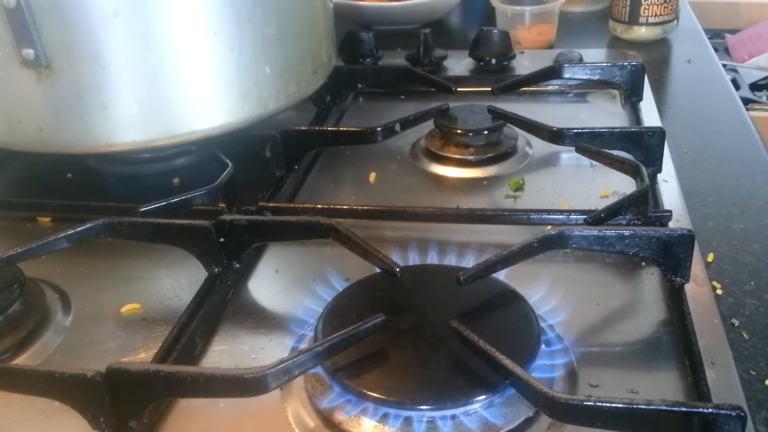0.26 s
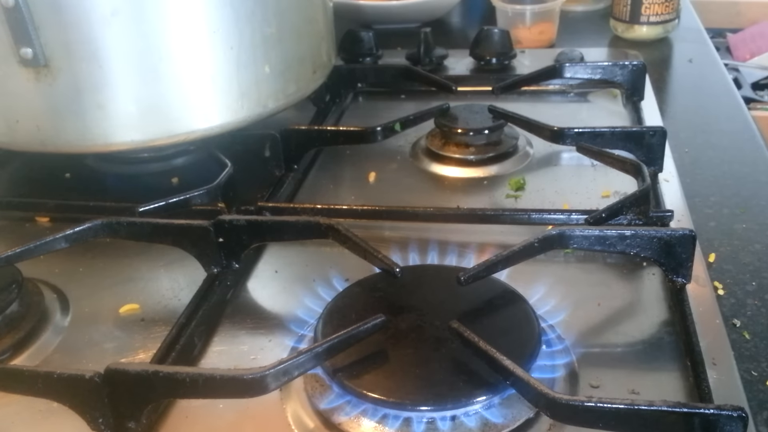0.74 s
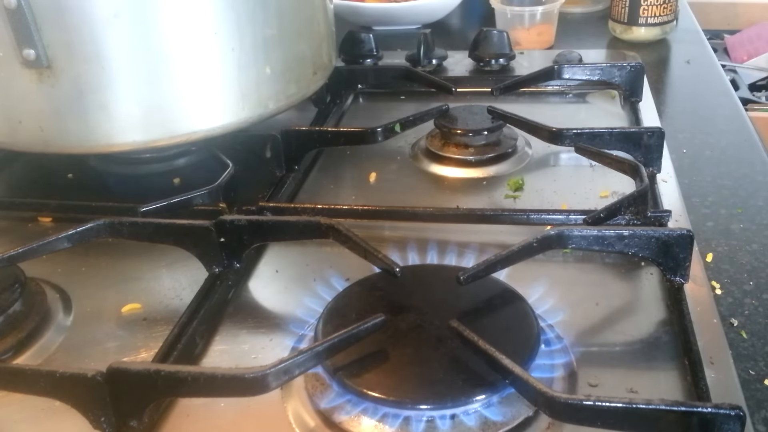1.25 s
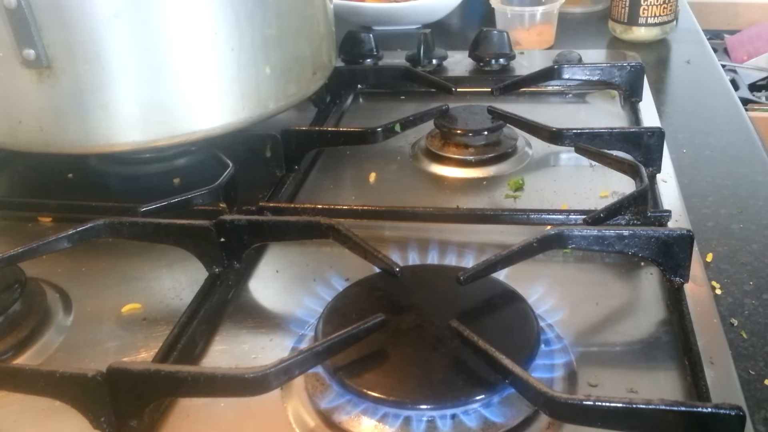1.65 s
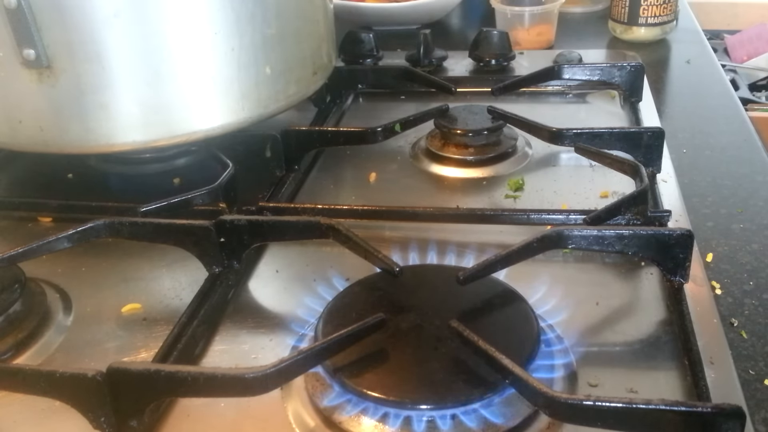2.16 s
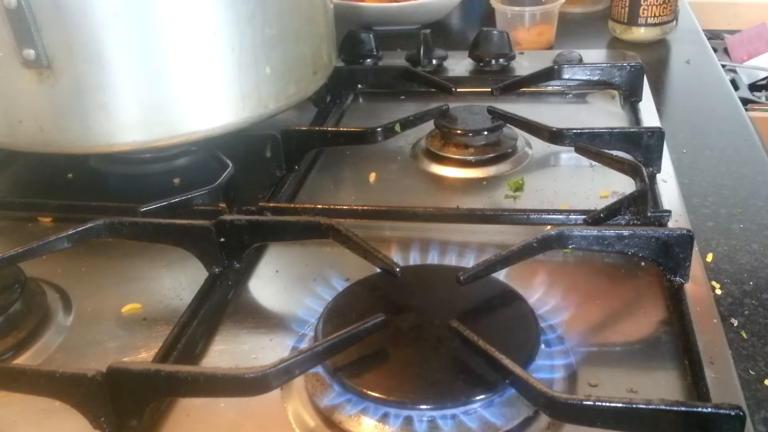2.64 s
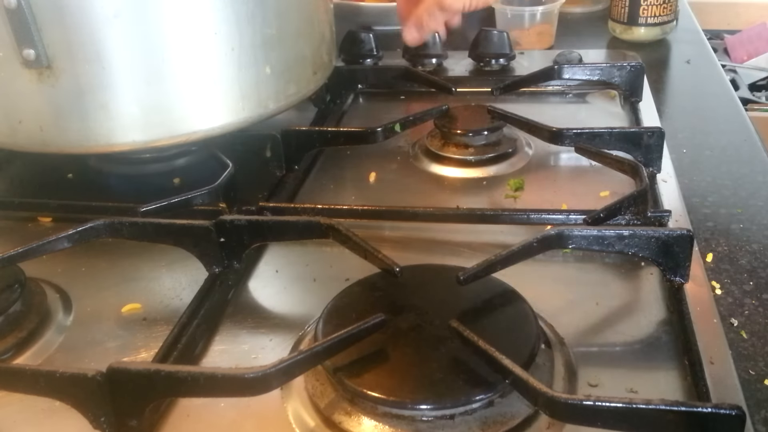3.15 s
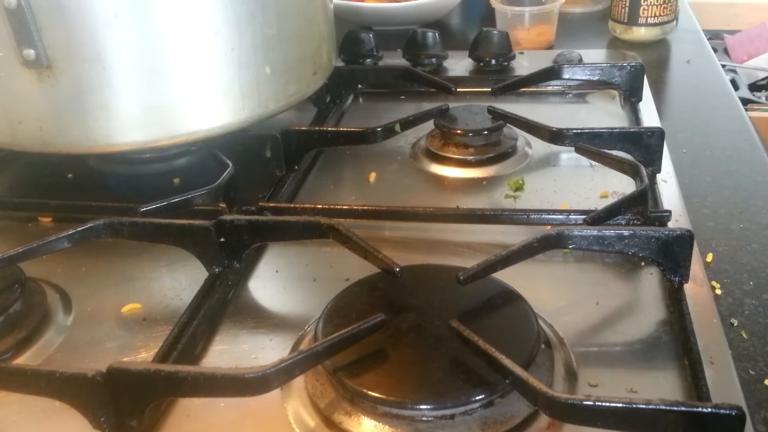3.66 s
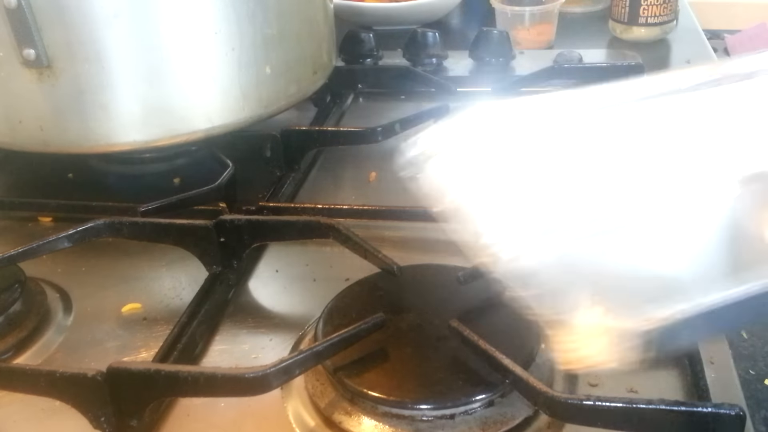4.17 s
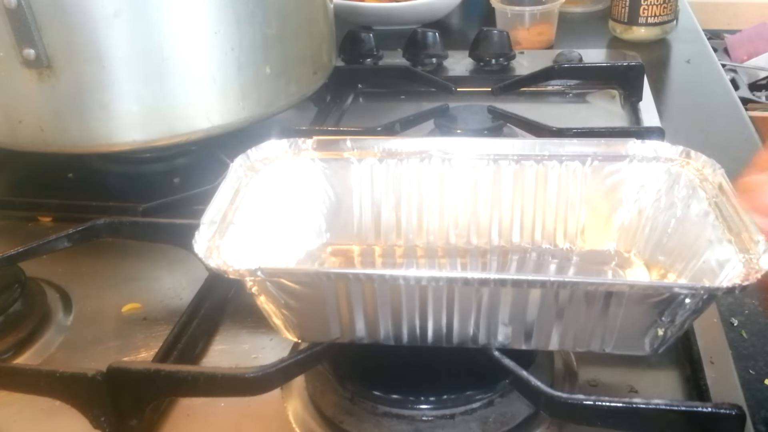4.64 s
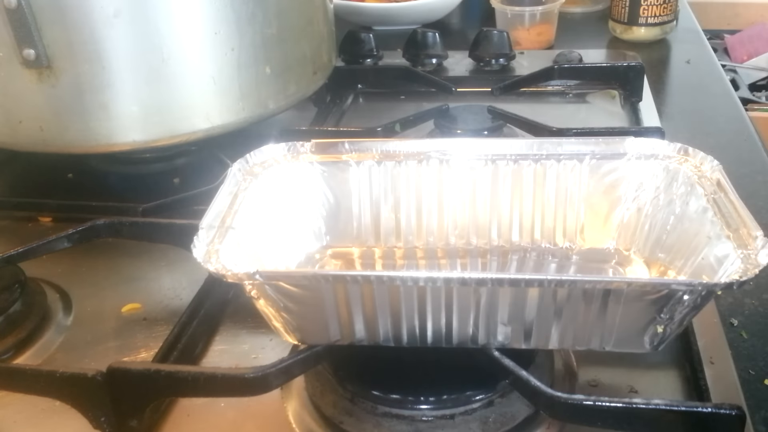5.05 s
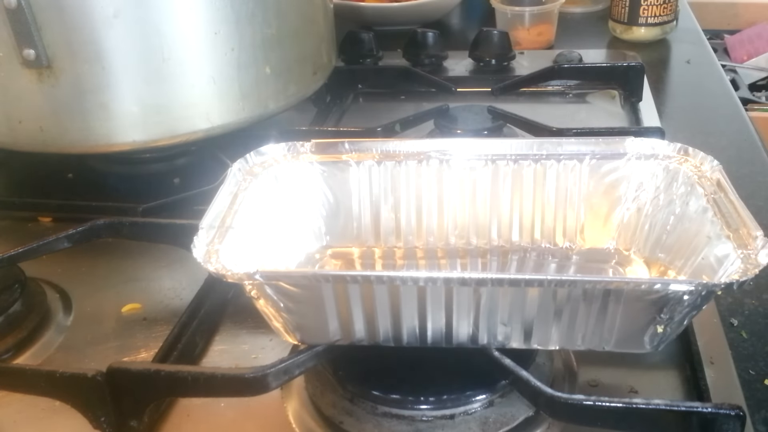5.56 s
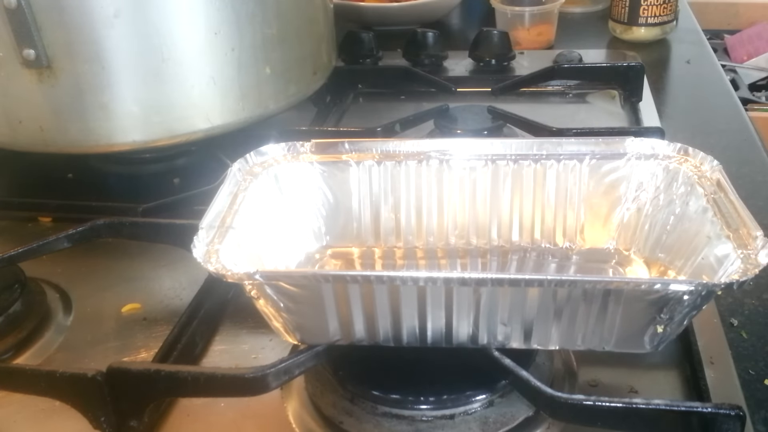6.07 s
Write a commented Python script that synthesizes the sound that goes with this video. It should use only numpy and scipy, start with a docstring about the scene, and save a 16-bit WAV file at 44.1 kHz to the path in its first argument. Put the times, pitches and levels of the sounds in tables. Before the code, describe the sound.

A metal spoon clangs and rattles on a thin pan over gas hiss, the burner clicks off, then a foil tray crinkles down.

```python
"""A gas ring hisses over an extractor's drone in a small kitchen: resonant noise, until the gas knob clicks off.
A steel spoon knocks, drags and rattles on thin aluminium cookware, early on and again at the end.
In between, a foil tray is picked up and set on the iron trivet, with a few soft low blips.
Ticks and grains drive the modes of sheet, pan, tray and spoon, mostly louder at the right microphone.
The loudest blows overload the microphone."""
import sys
import numpy as np
from scipy import signal
from scipy.fft import rfft, irfft
from scipy.io import wavfile
from scipy.ndimage import uniform_filter1d

SR = 44100
rng = np.random.default_rng(int(sys.argv[2]) if len(sys.argv) > 2 else 0)


def store_wav(level_fs):
    """Save 16-bit WAV to argv[1]."""
    pcm = np.round(np.clip(np.atleast_2d(level_fs), -1, 1) * 32767)
    wavfile.write(sys.argv[1], SR, pcm.T.astype(np.int16))


N = 277830

# All levels are relative, before the gains in the functions.
# Blows on pan, knob and tray: [t/s, tick level/dB, bass level/dB, treble level/dB, clatter t60/s]
BLOWS = [(0.3358, 10.5, -13.5, -19.5, 0.13), (0.4812, -9, -2.5, -63, 0.068), (0.5599, 2.5, -1.5, -3, 0.022),
         (0.6391, 2, -23, -20, 0.044), (0.7097, -9, -1.5, 5, 0.085), (0.7492, -22, -25, -27, 0.078),
         (0.795, -7.5, -10, -13, 0.088), (0.852, -17, -13, -35, 0.066), (0.892, -15, -12.5, -10, 0.1),
         (2.029, -16, -6, -11, 0.061), (2.0338, -1.5, -7, -7, 0.11), (2.0857, -6, -14, -47, 0.055),
         (2.2394, -3.5, -19, -27, 0.05), (2.2797, -8.5, -17, -29, 0.077), (2.3126, -1, -6.5, -0.5, 0.1),
         (3.157, -23.5, -4, -41, 0.13), (3.2031, -16.5, -17, -19, 0.02), (3.7509, -23.5, 2, -10, 0.079),
         (3.777, -5, -11.5, -16, 0.034), (4.0213, -5.5, -18, -10, 0.015), (4.4323, -5.5, -3.5, -13.5, 0.12),
         (4.5169, -12.5, -2, -25, 0.05), (4.5791, -16, -19, -35, 0.031), (4.6681, -17.5, -7.5, -33, 0.074),
         (4.7536, -24, -1.5, -33, 0.091), (4.8679, -33.5, 2.5, -12, 0.031),
         (5.8724, -9.5, -6.5, -29, 0.011), (6.003, -13.5, 2, -34, 0.063), (6.03, -9, -2, -18, 0.068)]
# Drags, rattles and reverberant tails of blows, swelling to a peak and fading:
# [peak t/s, peak level/dB, swell over 60 dB/s, fade over 60 dB/s, bass level/dB, treble level/dB]
DRAGS_AND_TAILS = [(0.418, -29, 0.15, 0.49, -11, -20.5), (0.59, -26.5, 0.052, 0.095, -11, -1),
                   (0.69, -32, 0.34, 0.15, -11, -15), (0.735, -36.5, 0.062, 0.27, -14, -5),
                   (0.852, -39, 0.33, 0.56, -9, -2.5), (2.074, -37, 0.091, 0.27, -4, -24),
                   (2.17, -42, 0.33, 0.81, -11, -17.5), (2.275, -31.5, 0.36, 0.09, -7, -25),
                   (2.356, -34, 0.041, 0.37, -7.5, -15), (3.225, -56.5, 0.047, 0.44, 1.5, -15),
                   (3.796, -28, 0.023, 0.091, -12, -49), (3.93, -57.5, 0.27, 0.26, 0, 2),
                   (4.075, -55, 0.05, 0.3, -3, -18), (4.16, -63, 0.2, 1.07, 0.5, 0),
                   (4.475, -36.5, 0.11, 0.39, -12, -21.5), (4.57, -41, 0.26, 0.79, -8, -40),
                   (5.0, -64.5, 0.8, 0.56, -6, -9), (5.84, -39.5, 0.035, 0.17, -3, -31),
                   (5.871, -39.5, 0.063, 0.052, -2, -1.5), (5.969, -39, 0.2, 0.13, -5, -18),
                   (6.075, -50.5, 0.068, 0.44, -1, -15)]
CLATTER_DB = -23.5  # clatter against the tick of its blow
CLUMP_DB, CLUMPS_PER_S = 1.5, 70  # grains come in uneven slips: spread/dB, rate/Hz
EDGE_DB, EDGE_FOLLOWS = 4, 0.4  # edge band: level/dB at treble 0 dB, dB per dB of treble
# Borders between the bass, middle, edge and treble of a contact: [f/Hz]
BAND_BORDERS_HZ = 900, 2400, 5300
# Colour of the thin metal: [f/Hz, level per Hz/dB]
SHEET_COLOUR = [(60, -40), (180, -14.5), (280, -7.5), (420, -1), (800, 0.5), (1300, 1.5), (2500, -3.5),
                (4500, -6.5), (5800, -13.5), (9700, -12), (15400, -33.5)]
# Metal and room dying together: [f/Hz, t60/s]
SHEET_T60 = [(200, 0.14), (1000, 0.21), (4000, 0.28), (12000, 0.18)]
# Likeness of the thin metal at the two microphones: [f/Hz, left-right correlation]
SHEET_LIKENESS = [(60, 0.15), (180, 0.79), (550, 0.53), (1650, 0.023), (4970, 0.015), (15000, 0.029)]
# Balance of the thin metal: [f/Hz, left minus right level/dB]
SHEET_BALANCE = [(60, 0), (240, -4), (950, -1.5), (3770, -8.5), (15000, -3.5)]
# The contact moves to a new spot on the metal: [t/s]
SPOT_TIMES = [0, .55, 1.5, 2.2, 3, 3.7, 4, 4.4, 5.5, 6.02]
# Low plate modes of the pan: [f/Hz, level/dB, t60/s]
PAN_MODES = [(180, -20, 0.043), (427, -10, 0.18), (416, 7, 0.13), (636, -12, 0.096), (793, 1, 0.089),
             (948, 11, 0.033), (1360, -18, 0.052)]
# Knob and foil tray are handled while the pan rests: [from t/s, to t/s]
PAN_RESTS = 3.0, 5.5
# Broad modes of the foil tray: [f/Hz, level/dB, t60/s]
TRAY_MODES = [(845, -15.5, 0.033), (1880, -18, 0.027), (2450, -12, 0.035), (2750, -10, 0.033)]
TRAY_FROM_S = 3.7  # the tray is picked up
# Spoon modes: [f/Hz, level struck on its rim/dB, level rattling loose/dB, level held tight/dB,
# t60 before the grip damps it/s, signed gain at the left microphone (right is 1)]
SPOON_MODES = [(2094, -16, -17, -28, .25, .4), (3148, -15, -13, -8, .3, .5), (3234, -18, -16, -11, .2, .5),
               (3593, -18, -21, -20, .2, .3), (3840, -16, -19, -19, .2, -.3), (3919, -6, -10, -19, .22, .1),
               (5163, -15, -14, -24, .15, .4), (6084, -16, -18, -34, .25, -.3),
               (6205, -16, -19, -34, .25, -.3), (7090, -24, -30, -28, .2, .6), (7467, -3, -16, -34, .2, .8),
               (7645, -20, -26, -34, .25, .7), (8663, -20, -20, -32, .3, .7),
               (9330, -18, -18, -29, .15, .7), (9851, -25, -26, -30, .1, -.6),
               (10290, -13, -16, -27, .1, -.5), (10800, -24, -29, -25, .1, .5),
               (11162, -11, -16, -28, .12, .5), (12040, -17, -19, -26, .1, -.8),
               (12620, -22, -23, -30, .1, .7), (13500, -21, -20, -28, .1, .8),
               (14300, -19, -21, -27, .1, .8)]
# Spoon struck on its rim, rattling loose, held tight: [from t/s, to t/s]
SPOON_SPANS = [(0.55, 0.63), (0.63, 1.12), (5.82, 6.22)]
# Strength of the spoon's ring in each span: [level/dB]
GRIP_DB = -6, -8.5, -2
# Share of the spoon's ring time left in each span: [ratio]
GRIP_T60_SHARE = 0.9, 0.75, 0.55
# The gas knob meets its catch, then snaps home: [t/s, level/dB, contact hardness as low-pass f/Hz]
KNOB_CLICKS = [(3.1590, -15.5, 710), (3.2056, -22.5, 8900)]
# Modes of the knob: [f/Hz, level/dB, t60/s]
KNOB_MODES = [(1150, -3, .07), (2700, -5, .04), (4800, -5, .1), (5150, -6, .16), (5500, -12, .06)]
# Gas flow: [t/s, level/dB]
GAS_FLOW = [(0, 2.5), (1.5, 4), (3.05, 2.5), (3.11, 3), (3.16, -32)]
# Burner resonances: [f/Hz, width of one filter pass/Hz, level/dB]
JET_PEAKS = [(1127, 306, -43.5), (2740, 790, -52), (3353, 130, -54), (6400, 270, -81), (7580, 220, -64),
             (8270, 230, -60), (3500, 7000, -53.5)]
# Short soft low blips: [t/s, level/dB, f/Hz]
BLIPS = [(4.898, -38, 510), (4.962, -40, 396), (4.994, -32.5, 536), (5.06, -39, 514), (5.089, -30, 520),
         (5.596, -39.5, 517)]
# Extractor and room air: [f/Hz, level per Hz/dB]
DRONE_COLOUR = [(18, -32), (30, -50), (59, -67.5), (85, -111), (114, -21.5), (219, -3.5), (243, -4.5),
                (478, -4.5), (531, 2), (574, -17.5), (708, -0.5), (1260, -15.5), (1910, -14),
                (13900, -27.5), (15400, -29)]
# Duct resonances: [f/Hz, width of one filter pass/Hz, level/dB]
DRONE_PEAKS = [(55.7, 8.3, -75), (120.7, 17, -51), (189.8, 40, -50.5), (376, 220, -52), (467.5, 166, -43.5),
               (3420, 1100, -53)]
# Likeness of the background at the two microphones: [f/Hz, left-right correlation]
DRONE_LIKENESS = [(60, 0.64), (180, 1), (550, 0.79), (1650, 0.11), (4970, -0.13), (15000, 0.11)]
# Balance of the background air: [f/Hz, left minus right level/dB]
DRONE_BALANCE = [(60, 2), (240, -8.5), (950, -3), (3770, -10.5), (15000, 1)]
AIR_DB = -41.5  # rms of the extractor's broad air noise
EDGES_HZ = 25 * 2 ** np.arange(0, 9.6, .5)  # half-octave noise bands
CUTOFF_HZ = 15600  # the top is 60 dB down from here up
LEFT_RIGHT = np.array([[1], [-1]])  # plus at the left microphone, minus at the right


def cookware():
    """Contacts coloured by hardness drive sheet, pan, tray and spoon; small thin metal radiates no deep bass."""
    middle, bass, edge, treble = contacts()
    low, mid, high = BAND_BORDERS_HZ
    thud = split(bass, [130, low], "band")
    force = split(middle, [low, mid], "band") + from_db(5.5) * thud
    force += from_db(4) * split(edge, [mid, high], "band")
    force += from_db(4.5) * split(treble, high, "high")
    t = np.arange(N) / SR
    on_pan = (t < PAN_RESTS[0]) | (t > PAN_RESTS[1])
    on_tray = ~on_pan & (t > TRAY_FROM_S)
    plate = split(modes(thud * on_pan, PAN_MODES), 108, "high")
    tray = modes(middle * on_tray, TRAY_MODES)
    return from_db(22) * sheet(force) + from_db(-15.5) * plate + from_db(3) * spoon(edge) + tray


def contacts():
    """Drive in rows middle, bass, edge, treble: tick and dying clatter per blow, grains per drag or tail."""
    force, t = np.zeros((4, N)), np.arange(N) / SR
    grains = metal_grains()
    age = t[:SR // 4]
    for s, peak_db, bass_db, treble_db, t60 in BLOWS:
        i = round(s * SR)
        dying = from_db(-60 * age / max(t60, .005))
        blow = from_db(CLATTER_DB) * grains[i:i + len(age)] * dying
        blow[0] += 1  # the tick
        force[:, i:i + len(age)] += from_db(peak_db) * contact_colour(bass_db, treble_db) * blow
    for s, peak_db, swell_s, fade_s, bass_db, treble_db in DRAGS_AND_TAILS:
        near = slice(round((s - swell_s) * SR), round((s + fade_s) * SR))
        away = np.maximum((s - t[near]) / swell_s, (t[near] - s) / fade_s)
        swell = from_db(peak_db - 60 * away)
        force[:, near] += swell * contact_colour(bass_db, treble_db) * grains[near]
    return force


def metal_grains():
    """Tiny random impacts of uneven size, 5000 per s on average, in clumps."""
    sizes = rng.standard_normal(N) * from_db(1.5 * rng.exponential(1, N))
    grains = sizes * (rng.random(N) < 5000 / SR)
    return rms_one(grains * from_db(CLUMP_DB * drift(CLUMPS_PER_S)))


def contact_colour(bass_db, treble_db):
    """Gains of middle, bass, edge and treble; a brighter contact also has more edge."""
    return from_db([[0], [bass_db], [EDGE_DB + EDGE_FOLLOWS * treble_db], [treble_db]])


def sheet(force):
    """Every spot on the metal answers with a response of its own."""
    out = np.zeros((2, N + SR))
    marks = [round(s * SR) for s in SPOT_TIMES] + [N]
    for a, b in zip(marks, marks[1:]):
        answer = signal.fftconvolve(force[None, a:b], sheet_response(), axes=1)
        out[:, a:a + answer.shape[1]] += answer
    return out[:, :N]


def sheet_response():
    """Thin metal has modes too dense to tell apart: a sharp front, then noise dying by band; energy 1."""
    age = np.arange(SR // 2) / SR
    front = 2.5 * from_db(-60 * age / .015)
    dying = lambda hz: front + from_db(-60 * age / max(at_hz(SHEET_T60, hz), .02))
    even = [(20, 0), (20000, 0)]
    flat = stereo_noise(len(age), even, SHEET_LIKENESS, even, dying)
    bins, hz = rfft(flat), np.arange(1, len(age) // 2 + 2) * SR / len(age)
    # no broad region of pitch stands out before the metal's colour is laid on
    bins /= np.sqrt(uniform_filter1d(np.abs(bins) ** 2, size=120) + 1e-12)
    bins *= from_db(at_hz(SHEET_COLOUR, hz) + at_hz(SHEET_BALANCE, hz) / 2 * LEFT_RIGHT)
    response = irfft(bins)
    response[:, len(age) * 3 // 4:] = 0  # nothing rings that long
    return response / np.sqrt(np.sum(response ** 2) / 2)


def spoon(force):
    """Contacts drive the spoon only while it touches; its hold sets strength and damping of its modes."""
    t, out = np.arange(N) / SR, 0
    for hz, *levels_db, t60, left in SPOON_MODES:
        for (start, end), grip_db, level_db, share in zip(SPOON_SPANS, GRIP_DB, levels_db, GRIP_T60_SHARE):
            touching = force * (t > start) * (t < end)
            ringing = ring(touching, hz, share * t60)
            out = out + from_db(grip_db + level_db) * ringing * [[left], [1]]
    return out


def knob():
    """Plastic-on-steel clicks ring the knob; a soft contact is a low-passed click."""
    clicks = np.zeros(N)
    for s, level_db, hard_hz in KNOB_CLICKS:
        click = from_db(level_db) * (np.arange(N) == round(s * SR))
        b, a = signal.butter(2, min(hard_hz, 20000), fs=SR)
        clicks += signal.lfilter(b, a, click + 1e-18)
    return modes(clicks, KNOB_MODES)


def burner():
    """The gas jet hisses through the resonances of the ring and stops with the flow."""
    flow_db = np.interp(np.arange(N) / SR, *np.transpose(GAS_FLOW), right=-90)
    hiss = resonant_noise(JET_PEAKS, DRONE_LIKENESS, flutter_db=2.5)
    return from_db(flow_db) * hiss * from_db(-1.5 * LEFT_RIGHT)


def blips():
    """Each a soft push into one low resonance, alike at both microphones."""
    out = np.zeros(N)
    for s, level_db, hz in BLIPS:
        push = np.zeros(N)
        push[round(s * SR)] = from_db(level_db)
        soft = signal.lfilter([.2, 0, -.2], [1, -1.8, .81], push)
        out += ring(soft, hz, t60=0.071)
    return out


def extractor():
    """Broad air noise, gently patchy, with a few duct resonances."""
    together = drift(2.6)
    patchy = lambda hz: from_db(1.0 * together + 1.8 * drift(6.2))
    air = rms_one(stereo_noise(N, DRONE_COLOUR, DRONE_LIKENESS, DRONE_BALANCE, patchy))
    return from_db(AIR_DB) * air + resonant_noise(DRONE_PEAKS, DRONE_LIKENESS, flutter_db=1.17)


def modes(force, table):
    """The force sets every mode ringing, louder at the right microphone."""
    total = sum(from_db(level_db) * ring(force, hz, np.clip(t60, .02, .5)) for hz, level_db, t60 in table)
    return total * [[.6], [1]]


def ring(clicks, hz, t60):
    """A damped resonator: a unit click sets a sine of height 1 ringing."""
    r, w = from_db(-60 / (t60 * SR)), 2 * np.pi * hz / SR
    return signal.lfilter([0, np.sin(w)], [1, -2 * r * np.cos(w), r * r], clicks + 1e-18)


def stereo_noise(size, spectrum, likeness, balance, envelope):
    """Half-octave bands of noise, each with its level, likeness, balance and envelope(hz)."""
    out, white = 0, rng.standard_normal((2, 2, size))
    for k, (low, high) in enumerate(zip(EDGES_HZ, EDGES_HZ[1:])):
        # neighbouring bands draw on different noise
        mid, side = split(white[k % 2], [low, high], "band", order=2)
        hz = np.sqrt(low * high)
        sides = from_db(at_hz(balance, hz) / 2 * LEFT_RIGHT)
        pair = stereo_pair(mid, side, at_hz(likeness, hz))
        out = out + from_db(at_hz(spectrum, hz)) * envelope(hz) * sides * pair
    return out


def resonant_noise(peaks, likeness, flutter_db):
    """Stereo noise through resonances, each fluttering on its own."""
    out = 0
    for hz, width, level_db in peaks:
        mid, side = rng.standard_normal((2, N))
        pair = stereo_pair(mid, side, at_hz(likeness, hz))
        r = np.exp(-np.pi * width / SR)
        for _ in range(2):  # twice, for steep flanks
            pair = signal.lfilter([1, 0, -1], [1, -2 * r * np.cos(2 * np.pi * hz / SR), r * r], pair)
        out = out + from_db(level_db + flutter_db * drift(11.7)) * rms_one(pair)
    return out


def stereo_pair(mid, side, likeness):
    """Two independent noises mixed to a given left-right correlation."""
    alike = np.clip(likeness, -1, 1)
    return np.sqrt(1 + alike) * mid + np.sqrt(1 - alike) * side * LEFT_RIGHT


def drift(rate):
    """Slow random wander of rms 1, low-passed near rate in Hz and drawn every 40 samples."""
    r = np.exp(-80 * np.pi * rate / SR)
    noise = rng.standard_normal(N // 40 + 2002)
    slow = signal.lfilter([1], [1, -2 * r, r * r], noise)[2000:]
    return np.interp(np.arange(N) / 40, np.arange(len(slow)), rms_one(slow))


def split(x, hz, kind, order=3):
    """One frequency band of a sound."""
    return signal.sosfilt(signal.butter(order, hz, kind, fs=SR, output="sos"), x + 1e-18)


def at_hz(points, hz):
    """A table read on a log-frequency axis."""
    table = np.array(points)
    return np.interp(np.log(hz), np.log(table[:, 0]), table[:, 1])


def from_db(db):
    """Gain of a level in dB."""
    return 10 ** (np.asarray(db) / 20)


def rms_one(x):
    """Scaled to unit rms."""
    return x / np.sqrt(np.mean(x ** 2) + 1e-20)


def scene():
    """All sources at the two microphones."""
    return cookware() + knob() + burner() + blips() + extractor()


def record(dry):
    """Gain control ducks a moment after loud sound, peaks hit the ceiling, the top is cut."""
    power = uniform_filter1d(np.mean(dry ** 2, 0), size=441)
    over_db = np.maximum(10 * np.log10(power + 1e-12) + 15, 0)  # above -15 dB
    slope = 60 * np.arange(N) / SR  # the hold falls by 60 dB per s
    held_db = np.maximum.accumulate(over_db + slope) - slope
    late = np.concatenate([np.zeros(1200), held_db[:-1200]])  # it reacts 27 ms late
    ducked = dry * from_db(-.4 * uniform_filter1d(late, size=200))
    squeezed = ducked / (1 + np.abs(ducked) ** 6) ** (1 / 6)
    top_cut = signal.cheby2(12, 60, CUTOFF_HZ, fs=SR, output="sos")
    return np.clip(signal.sosfilt(top_cut, squeezed), -1, 1)


dry = scene()
out = record(dry)
store_wav(out)
```